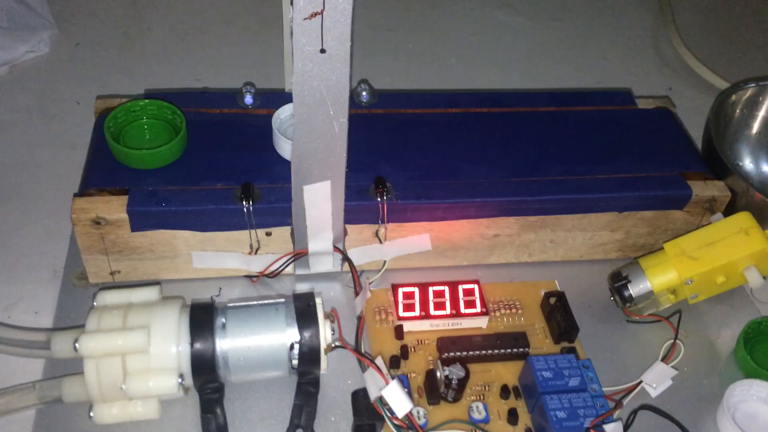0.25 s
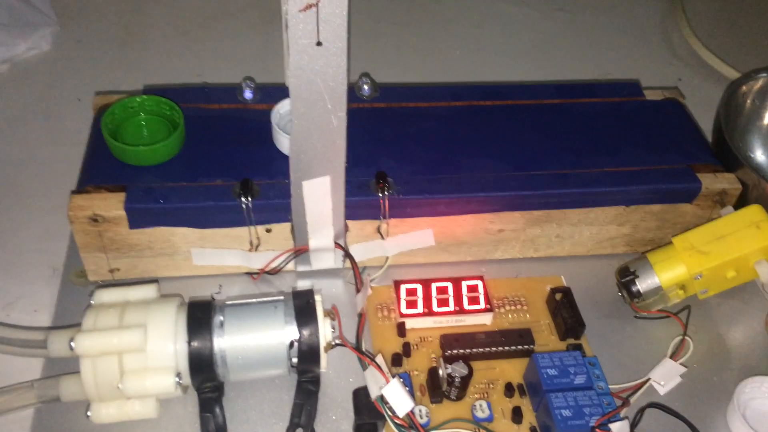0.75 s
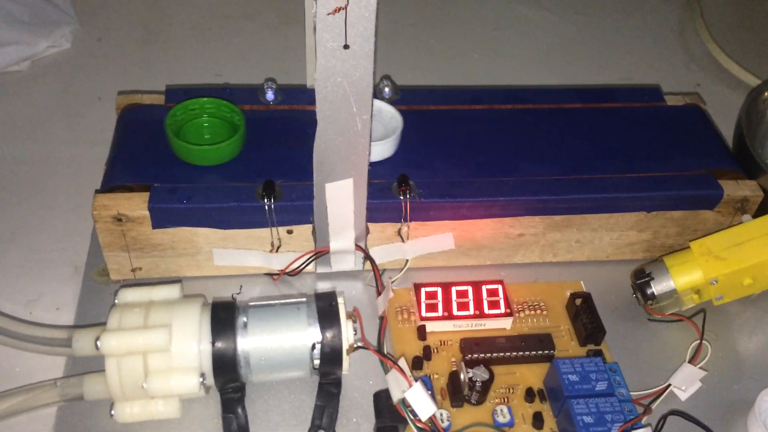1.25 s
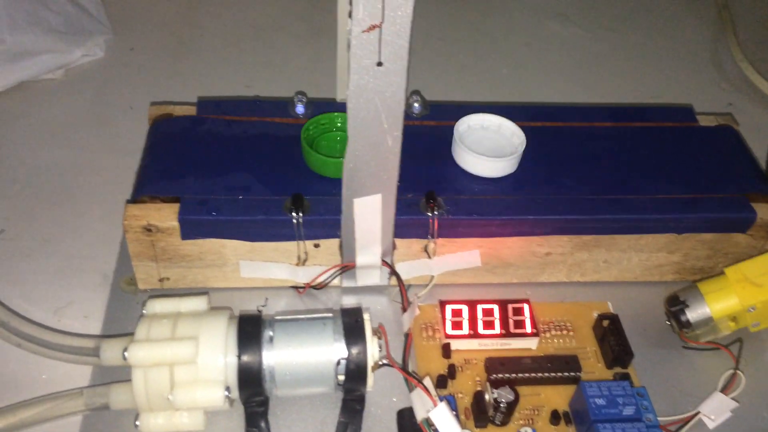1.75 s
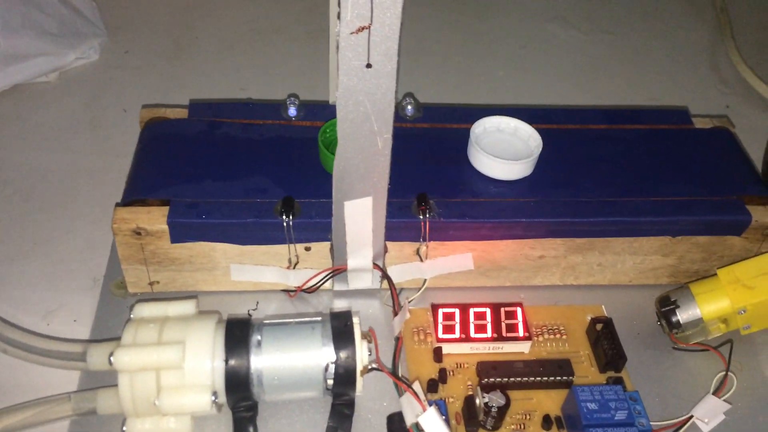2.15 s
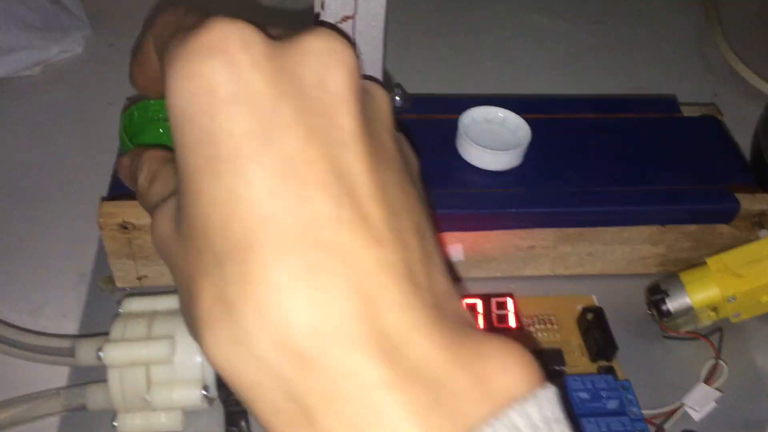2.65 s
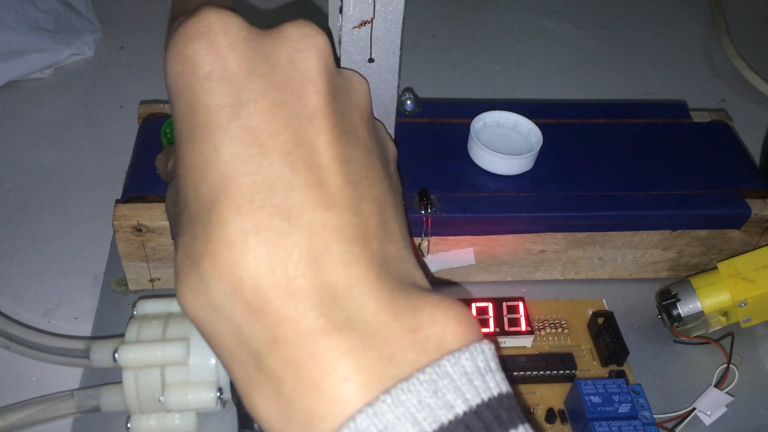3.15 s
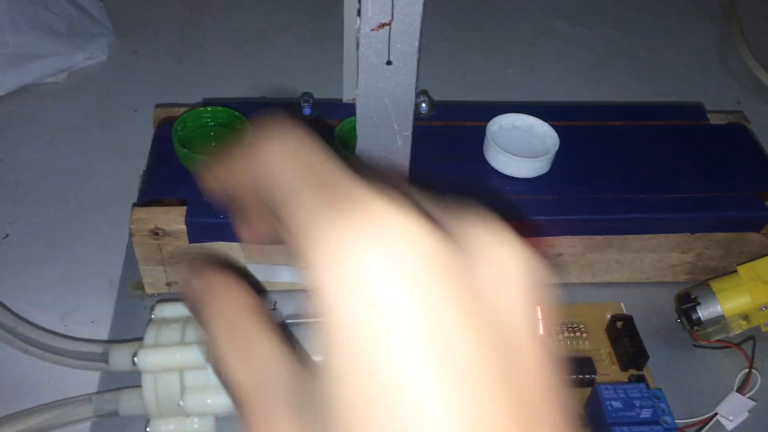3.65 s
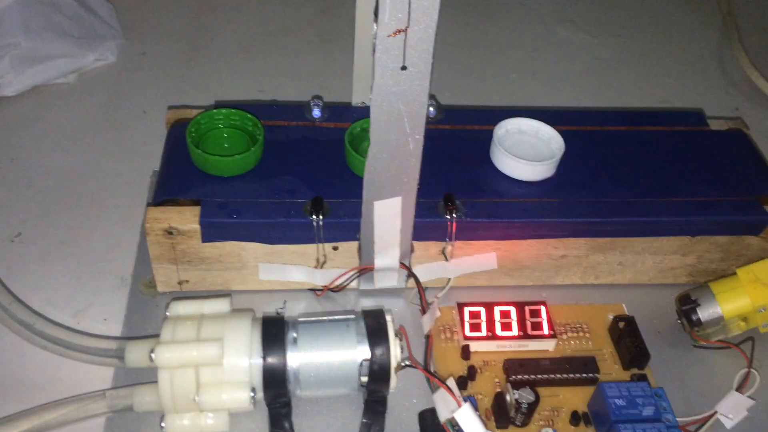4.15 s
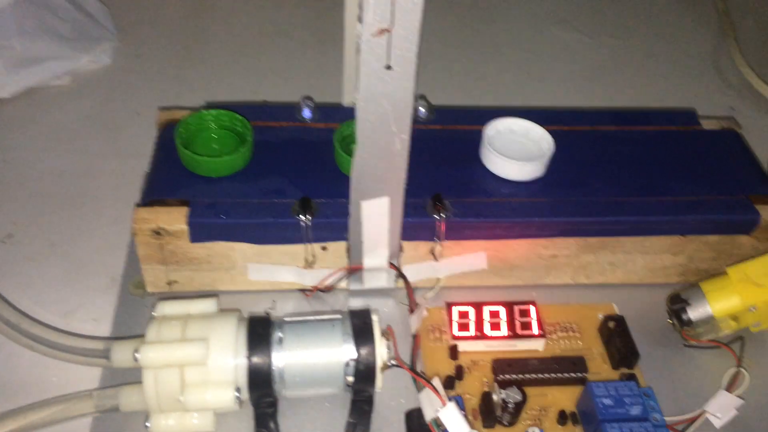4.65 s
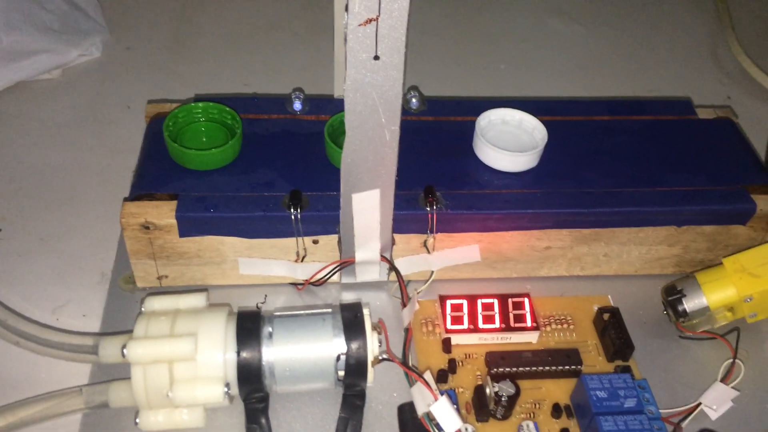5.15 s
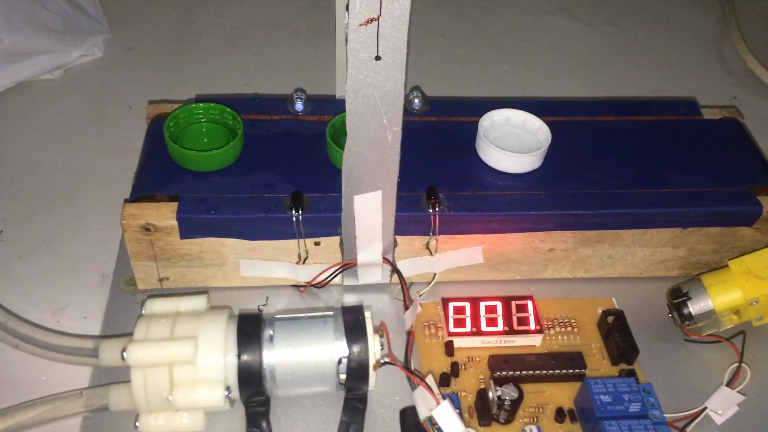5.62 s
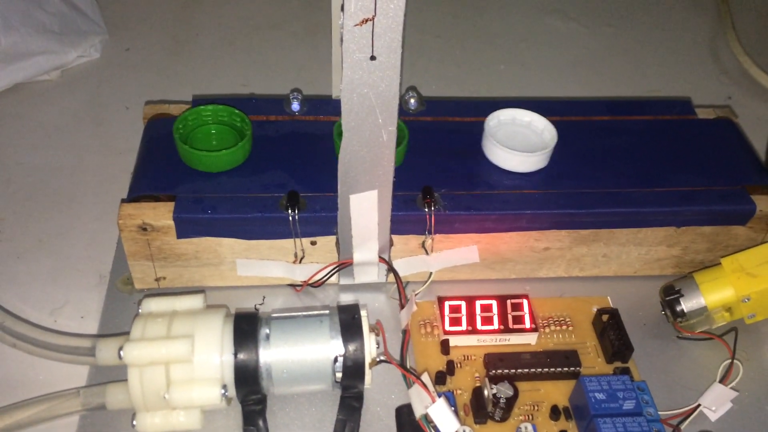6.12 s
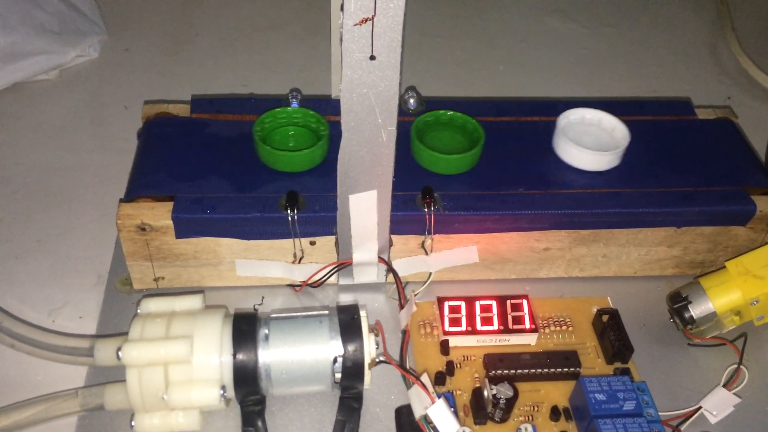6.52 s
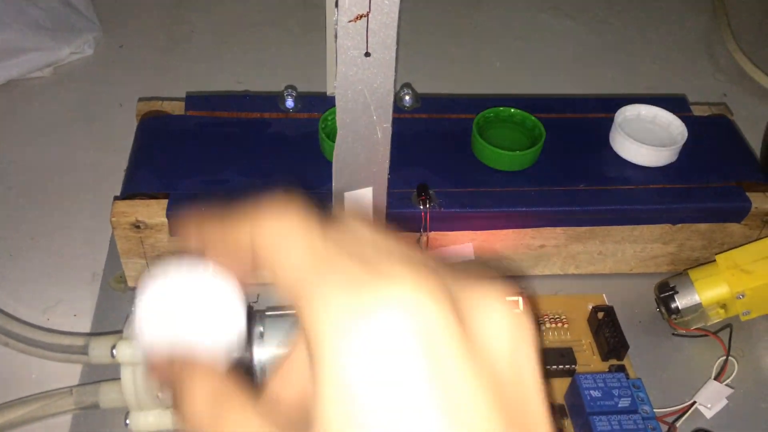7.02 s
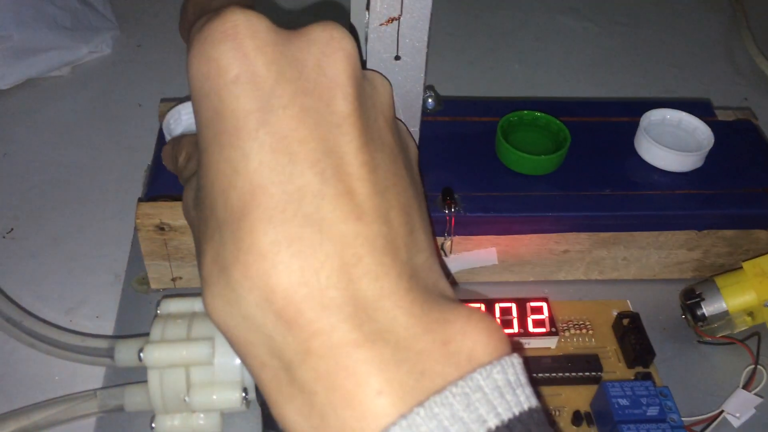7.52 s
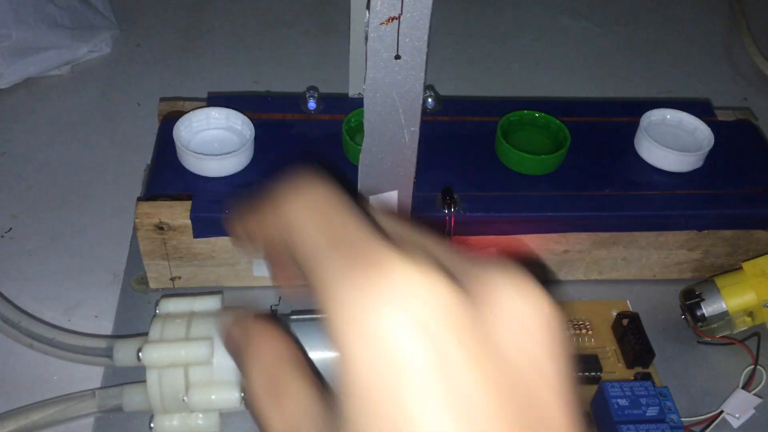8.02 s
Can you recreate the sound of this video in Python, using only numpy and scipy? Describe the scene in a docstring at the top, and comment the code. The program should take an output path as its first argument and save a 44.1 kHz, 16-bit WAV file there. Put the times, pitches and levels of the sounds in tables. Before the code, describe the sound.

Close up on a table in a small quiet room, a plastic cap scrapes briefly. A sharp relay click starts a small gear motor, which whirrs with a harsh nasal rattle for under a second, clicks off and coasts down. A second relay clicks on and off. Fingers tick lightly on plastic caps over a low hum. Later the same motor burst and relay clicks repeat, ending with more soft ticks.

```python
"""Small bottle-cap filling line

A model filling line on a table, heard close up. Twice a relay starts a small plastic gear motor that drives
the belt, is switched off and coasts to rest; a second relay then clicks on and off.
A cap is scraped off the table and others tick under the fingers, over the low hum of a small room.
Gear blows and noise ring plastic shapes, short cracks make the clicks and ticks, sines make hum and tones."""
import sys
import numpy as np
from scipy import signal
from scipy.fft import rfft, irfft, next_fast_len
from scipy.io import wavfile
from scipy.ndimage import uniform_filter1d, map_coordinates

SR = 44100
rng = np.random.default_rng(int(sys.argv[2]) if len(sys.argv) > 2 else 0)


def unload_wav(signal):
    """Save mono or channel-first audio to the path in sys.argv[1] as 16-bit WAV at rate SR, clipped to [-1, 1]."""
    wavfile.write(
        sys.argv[1],
        SR,
        np.round(np.clip(np.atleast_2d(signal).T, -1, 1) * 32767).astype(np.int16),
    )


N = 365059  # length in samples

# Belt runs. Each row: power on and power off in seconds, coasting time in seconds, tooth rate at full speed
# in hertz before any drag, then base levels in dB of the clean tooth tone, gear clatter and brush hiss.
BELT_RUNS = [(1.176, 1.859, .32, 546.7, -32, -32, -37.5), (6.158, 6.826, .325, 539.6, -33, -31, -37)]
# Once in each run the belt drags, which slows the motor and loads the gears. Each row: start and end in
# seconds, sag of the tooth rate in hertz, added clatter in dB.
BELT_DRAGS = [(1.67, 1.9, 17, 4), (6.498, 6.71, 15, 3)]
# Tone colours of the drive: housing, loaded gears, slack gears while coasting, and brushes.
# Each row: frequency in hertz, relative level in dB per hertz.
HOUSING_COLOUR = [(280, -37), (350, -23), (430, -32.5), (500, -14.5), (570, -7), (615, 0), (715, 1),
                  (770, -4.5), (880, -18), (950, -21), (1200, -48)]
GEAR_COLOUR = [(700, -35), (880, -11.5), (1050, 2), (1230, -1.5), (1330, -12), (1480, -9.5), (1620, 0.5),
               (1850, -6.5), (2020, -1), (2450, -2.5), (3000, -6), (3220, -16), (3700, -13), (4200, -22),
               (4600, -37.5), (6100, -66)]
SLACK_COLOUR = [(520, -41), (880, -7.5), (1010, -3.5), (1160, -0.5), (1350, -17.5), (1680, -6), (1850, -13),
                (2360, -4.5), (2760, -22.5), (3020, -15), (3240, -25.5), (3680, -24), (4700, -48),
                (6110, -70), (10300, -120)]
BRUSH_COLOUR = [(2590, -32.5), (4400, -10.5), (4770, -16.5), (5730, -5.5), (6780, -7), (7510, -1.5),
                (8500, -4.5), (12100, -0.5), (13300, -0.5), (14300, -7), (15200, -8), (16000, -12.5)]
# Narrow resonances of the gearbox shell. Each row: frequency in hertz, relative level in dB.
SHELL_MODES = [(608.3, -38), (1233, -44.5), (1583, -57), (2186, -52.5), (2789, -52.5), (3591, -58)]
# Clean lines of the motor. Each row: multiple of the shaft rate, level in dB relative to the tooth tone.
MOTOR_LINES = [(9, 2), (12, -4.5), (18, -18), (21, -16)]
# Relay armatures snapping shut. Each row: time of the main hit in seconds, base level in dB, level of the
# first touch in dB relative to that, and how many seconds earlier the touch comes.
RELAY_CLOSINGS = [(1.176, -14.5, -15.5, 0.00323), (2.218, -16, -22, 0.00075), (6.1596, -14.5, -19, .0035),
                  (7.1847, -16.5, -26.5, 0.00065)]
# Relay armatures springing back. Each row: time in seconds, base level in dB.
RELAY_OPENINGS = [(1.858, -21.5), (2.576, -26.5), (6.826, -21.5), (7.5425, -27.5)]
# Tone colours of the two relay clicks. Each row: frequency in hertz, relative level in dB per hertz.
CLOSING_COLOUR = [(240, -52), (400, -10), (700, -9.5), (2150, -12.5), (2880, -2.5), (3580, -13.5),
                  (4180, -9), (4950, -13), (6540, -5), (7400, -6), (8300, 2), (9400, -15), (10400, -6),
                  (12000, -16), (14600, -19), (16000, -37)]
OPENING_COLOUR = [(290, -39), (500, -11), (855, -0.5), (1640, -19.5), (2390, -8), (2650, -24.5),
                  (3440, -2.5), (3980, -16), (5020, -9), (6060, -6.5), (7980, -17), (9220, 0), (11300, -17),
                  (14700, -14), (16000, -35.5)]
# A cap sliding over the table, one long faint scrape with two short louder ones.
# Each row: start and end in seconds, base level in dB, brightness from 0 (dull) to 1 (full).
SCRAPE_STROKES = [(0.679, 0.849, -54.5, 0.67), (.723, 0.763, -42, 0.93), (0.826, 0.841, -39, 0.21)]
# Tone colour of the scrape. Each row: frequency in hertz, relative level in dB per hertz.
SCRAPE_COLOUR = [(300, -37), (430, -19.5), (550, -1.5), (720, -11), (1010, 2), (1250, -10), (1860, -3.5),
                 (2270, -13), (2900, -8), (3500, -9.5), (4600, -33), (7500, -27.5), (10000, -38),
                 (16000, -49)]
# Light plastic ticks. Each row: time in seconds, wall ring in hertz and its base level in dB,
# rim ring in hertz and its base level in dB, dry snap level in dB.
CAP_TICKS = [(2.4575, 3260, -42, 5392, -38, -59), (2.4955, 3200, -60.5, 11460, -41.5, -69.5),
             (3.0278, 2280, -40, 3260, -45, -57.5), (3.321, 3050, -29.5, 6240, -44, -46.5),
             (3.4185, 2323, -40, 6200, -62, -57), (3.474, 2116, -45.5, 7000, -61.5, -61.5),
             (3.5745, 4680, -33.5, 6150, -30.5, -49), (3.6794, 2900, -46.5, 6500, -50.5, -63),
             (3.7015, 2850, -40.5, 6600, -38.5, -56), (3.7565, 3180, -53.5, 9795, -49.5, -60),
             (3.937, 3800, -55, 8480, -29.5, -60), (4.9236, 2196, -33.5, 4150, -46, -42.5),
             (7.582, 6500, -47, 10430, -38, -61), (7.716, 3760, -38.5, 6000, -49, -48.5),
             (7.937, 2944, -41.5, 5300, -35, -49.5), (8.084, 2090, -38.5, 6700, -50, -55),
             (8.09, 2070, -38, 6900, -35, -50), (8.1237, 2100, -44.5, 4000, -58, -60.5)]
# Faint rustles of the hand. Each row: middle in seconds, level in dB, half the duration in seconds.
HAND_RUSTLES = [(0.337, -60.5, 0.0077), (2.636, -72, 0.076), (2.73, -72.5, 0.043), (5.256, -64.5, 0.033)]
# Fingers at work on the caps. Each row: start and end in seconds, loudest tick in dB, rubbing in dB.
FINGER_WORK = [(2.37, 2.74, -57, -62.5), (2.8, 3.824, -64.5, -69.5), (7.36, 7.7, -58, -62),
               (7.899, 8.194, -61, -65.5)]
# Tone colour of skin on plastic. Each row: frequency in hertz, relative level in dB per hertz.
RUB_COLOUR = [(250, -20), (500, 2), (800, 2.5), (1200, -10), (2000, -9.5), (3500, -23), (7000, -23.5),
              (16000, -32)]
# Tone colour of the room air. Each row: frequency in hertz, relative level in dB per hertz.
AIR_COLOUR = [(25, -36), (40, -8.5), (62, -2.5), (120, -2), (200, -10.5), (290, -12.5), (450, -19),
              (600, -21.5), (850, -19.5), (1300, -28), (2200, -36.5), (4500, -46.5), (10000, -47),
              (16000, -54)]
# Slow swells of the low background. Each row: peak in seconds, half-width in seconds,
# rise of the hum in dB, rise of the rumble in dB.
LOW_SWELLS = [(.4, 0.485, 14, 7), (1.6, .15, 5, 4.5), (4.25, 0.52, 14, 3.5), (6.7, 0.16, 8.5, 1.5),
              (8.05, 1, 2.5, 6)]
# Faint tones that come and go in the room. Each row: start and end in seconds, pitch in hertz, level in dB.
FAINT_TONES = [(-.2, .75, 274.5, -64.5), (-.2, .7, 503, -66.5), (2.6, 3.45, 357, -63.5),
               (2.6, 6.103, 444.6, -72.5), (4.398, 5.901, 2859, -87)]
# How the room dies away. Each row: frequency in hertz, seconds to fall by 60 dB.
ROOM_DECAY = [(200, 0.315), (2500, 0.449), (8000, 0.3), (15000, .38)]
# More tone colours: dry snaps and rustles, finger ticks, rumble, and relay clicks spread by the room.
# Each row: frequency in hertz, relative level in dB per hertz.
SNAP_COLOUR = [(600, -1.5), (1500, -0.5), (2600, -0.5), (7000, -8), (11000, -10.5), (16000, -7.5)]
FINGER_TICK_COLOUR = [(1500, -6.5), (3500, 2.5), (6000, -5), (11000, -3.5), (16000, -3.0)]
RUMBLE_COLOUR = [(40, -41), (70, -7.5), (125, 0.5), (200, 0.0), (260, -19), (700, -54.5)]
DIFFUSE_COLOUR = [(400, -23.5), (1500, 7), (3000, -3), (8000, -3.5), (12000, -9), (16000, -13)]
# Tone colour of ringing plastic. Each row: multiple of its pitch, relative level in dB per hertz.
PLASTIC_COLOUR = [(.5, -42), (0.845, -17), (1, 0), (1.206, -14), (2.02, -34), (3, -55)]

DRAG_RAMP_S = .07  # how fast a drag sets in and lets go
SPIN_UP_S, SLACKEN_S = .032, 0.1234  # time constant of the motor; time for unpowered gears to go slack
DRONE_DB, DRAG_DRONE_DB = -31.5, 1  # the housing at full speed, and its rise under a drag
SURGE_DB, SURGE_S = 4.5, .22  # extra clatter while the belt gets going, and how long it lasts
SLACK_DRONE_DB, SLACK_SHELL_DB = -9, -3.5  # slack gears drum less on the housing and ring the shell less
# while coasting each level follows this power of the speed
DRONE_POWER, CLATTER_POWER, HISS_POWER = .45, 0.163, 2.13
STALL_SPEED, STALL_POWER = 0.286, 2.6  # below this share of full speed the gears fall quiet, by this power
STROKE_ATTACK_S, STROKE_T60_S = .011, .04  # the rim catches; then seconds to fall 60 dB after a stroke
HUM_HZ, HUM_DB, RUMBLE_DB = 61.93, -61.5, -59  # average hum pitch; low levels between swells
AIR_DB = -53
TONE_FADE_S = 0.123
TOP_HZ = 15800  # nothing is kept from here up


def gear_motor(run, drag):
    """The motor spins up, meshes its gears under load and coasts down once the power is cut."""
    on, off, coast, tooth_hz, whine_db, clatter_db, hiss_db = run
    drag_start, drag_end, sag_hz, drag_db = drag
    t = np.arange(N) / SR
    age = np.maximum(t - on, 0)
    spin_up = 1 - np.exp(-age / SPIN_UP_S)
    run_down = np.clip(1 - (t - off) / coast, 0, 1)
    speed = spin_up * run_down
    load = np.clip(.5 + np.minimum(t - drag_start, drag_end - t) / DRAG_RAMP_S, 0, 1)
    tooth_rate = speed * (tooth_hz - sag_hz * load) * (1 + .003 * wobble(40))
    teeth = np.cumsum(tooth_rate) / SR  # running count of teeth gone by
    shaft = teeth / 9  # turns of a nine-tooth pinion

    # the blows drum on the housing and ring the shell, and the gears chatter after each one
    drum = tooth_blows(teeth, scatter=0.000487, pitch_error=.0006, uneven_db=1.5)
    drone = steady(colour(drum, HOUSING_COLOUR))
    mesh = tooth_blows(teeth, scatter=.00006, pitch_error=.0004, uneven_db=2.5)
    chatter = rng.standard_normal(N) * (1 + .5 * np.cos(2 * np.pi * teeth))
    loaded = 0.633 * steady(colour(mesh, GEAR_COLOUR)) + 0.656 * colour(chatter, GEAR_COLOUR)
    blows = tooth_blows(teeth, scatter=.0004, pitch_error=.0002, uneven_db=2)
    shell = 0.643 * steady(resonate(blows, SHELL_MODES, width_hz=24.3))

    # without power the gears go slack and rattle between their flanks
    slackness = np.clip((t - off) / SLACKEN_S, 0, 1)
    slack = 0.398 * steady(colour(blows, SLACK_COLOUR)) + 0.67 * colour(chatter, SLACK_COLOUR)
    clatter = np.sqrt(1 - slackness) * loaded + np.sqrt(slackness) * slack
    clatter += amp(SLACK_SHELL_DB * slackness) * shell

    # the brushes rub harder once a turn and bump over the three commutator segments
    rubbing = np.cos(2 * np.pi * shaft) + np.cos(6 * np.pi * shaft) + np.cos(12 * np.pi * shaft)
    rub_db = (1 + 1.282 * slackness) * rubbing + 1.57 * wobble(300)
    hiss = colour(rng.standard_normal(N) * amp(rub_db), BRUSH_COLOUR)

    # the lines are strong only near full speed, where they meet the housing's resonances
    whine = np.zeros(N)
    for order, db in MOTOR_LINES:
        line = np.sin(2 * np.pi * round(order) * shaft)
        whine += line * amp(whine_db + db + 1.9 * wobble(12)) * speed ** 7

    # levels follow speed and load
    drone_db = DRONE_DB + DRAG_DRONE_DB * load + SLACK_DRONE_DB * slackness ** 2 + 0.9 * wobble(20)
    surge_db = SURGE_DB * np.exp(-(age / SURGE_S) ** 2)
    rattle_db = clatter_db + surge_db + drag_db * load + 0.48 * wobble(20)
    body = amp(drone_db) * run_down ** DRONE_POWER * drone
    body += amp(rattle_db) * run_down ** CLATTER_POWER * clatter
    body += amp(hiss_db) * run_down ** HISS_POWER * hiss
    turning = spin_up ** .7 * np.clip(run_down / STALL_SPEED, 0, 1) ** STALL_POWER
    return whine + turning * body


def tooth_blows(teeth, scatter, pitch_error, uneven_db, count=9):
    """One blow per pinion tooth, each with its own strength and spacing error (s); backlash scatters them (s)."""
    at = np.flatnonzero(np.diff(np.floor(teeth)) > 0)
    late, size = rng.standard_normal((len(at), 2)).T
    # these errors repeat every turn of the pinion
    wear, offset = rng.standard_normal((count, 2))[np.arange(len(at)) % count].T
    shift = SR * (scatter * late + pitch_error * unit(offset))
    at = np.clip(np.round(at + shift).astype(int), 0, N - 1)
    return np.bincount(at, amp(uneven_db * (size + wear)), N)


def relays():
    """Armatures touch lightly, snap shut with a sharp click and rebound faintly.

    Springing back they bounce and ring the circuit board."""
    shut, spring, board = np.zeros((3, N))
    t = np.arange(SR // 10) / SR
    for s, db, touch_db, lead in RELAY_CLOSINGS:
        add(shut, s - lead, amp(db + touch_db) * burst(t60=0.027))  # first touch
        add(shut, s, amp(db - 3.0) * burst(t60=0.00756))  # main hit
        add(shut, s + 0.0011022, amp(db - 11.5) * burst(t60=0.021))  # faint rebound
    board_ring = np.sin(2 * np.pi * 720 * t) * amp(-60 * t / 0.0418)
    for s, db in RELAY_OPENINGS:
        add(spring, s, amp(db - 1.5) * burst(t60=0.01844))
        add(spring, s + 0.0022, amp(db - 6.5) * burst(t60=.035))  # the bounce
        add(board, s + 0.00599, amp(db - 5.5) * board_ring)
    return colour(shut, CLOSING_COLOUR) + colour(spring, OPENING_COLOUR) + board


def scrape():
    """The rim of a cap sticks and slips across the table, as uneven noise mixed from bright and dull."""
    t = np.arange(N) / SR
    slips = unit(colour(rng.standard_normal(N) * amp(2 * wobble(500)), SCRAPE_COLOUR))
    dull = unit(signal.lfilter(*signal.butter(2, 1700, fs=SR), slips))
    sound = np.zeros(N)
    for start, end, db, brightness in SCRAPE_STROKES:
        attack = np.clip((t - start) / STROKE_ATTACK_S, 0, 1)
        stroke = attack * amp(db - 60 * np.maximum(t - end, 0) / STROKE_T60_S)
        sound += stroke * (brightness * slips + (1 - brightness) * dull)
    return sound


def caps():
    """A tiny snap rings a thin plastic wall and rim at pitches set by the spot touched; fingers rustle."""
    rings, snaps = np.zeros((2, N))
    for s, wall_hz, wall_db, rim_hz, rim_db, snap_db in CAP_TICKS:
        add(rings, s, amp(wall_db - 8.5) * ring(wall_hz) + amp(rim_db - 9.0) * ring(rim_hz))
        add(snaps, s, amp(snap_db) * burst(t60=0.013))
    for s, db, half_length in HAND_RUSTLES:
        swell = np.hanning(round(2 * half_length * SR))
        add(snaps, s - half_length, amp(db) * swell * rng.standard_normal(len(swell)))
    return rings + colour(snaps, SNAP_COLOUR)


def ring(hz):
    """A damped plastic resonance: a short crack coloured by a peak at the given pitch."""
    return colour(burst(t60=0.01947), [(ratio * hz, db) for ratio, db in PLASTIC_COLOUR])


def fiddling(count=20):
    """Fingers rub softly over thin plastic and make a scatter of tiny bright ticks."""
    ticks, rub = np.zeros((2, N))
    for start, end, db, rub_db in FINGER_WORK:
        swell = signal.windows.tukey(round((end - start) * SR))
        add(rub, start, amp(rub_db) * swell * rng.standard_normal(len(swell)))
        for when, softness in rng.random((count, 2)):
            add(ticks, start + when * (end - start), amp(db - 8.6 * softness) * burst(t60=0.02))
    return colour(rub * amp(1.6 * wobble(30)), RUB_COLOUR) + colour(ticks, FINGER_TICK_COLOUR)


def background():
    """Room air as noise, with a slowly swelling rumble, a wavering low hum and a few faint tones."""
    t = np.arange(N) / SR
    air = amp(AIR_DB) * unit(colour(rng.standard_normal(N), AIR_COLOUR))
    hum_rise_db, rumble_rise_db = np.zeros((2, N))
    for peak, width, hum_db, rumble_db in LOW_SWELLS:
        swell = np.exp(-((t - peak) / width) ** 2)
        hum_rise_db += hum_db * swell
        rumble_rise_db += rumble_db * swell
    rumble = unit(colour(rng.standard_normal(N), RUMBLE_COLOUR))
    rumble *= amp(RUMBLE_DB + rumble_rise_db + 1.08 * wobble(8.5))
    hum = np.sin(2 * np.pi * np.cumsum(HUM_HZ + 1.3 * wobble(6.2)) / SR)
    hum *= amp(HUM_DB + hum_rise_db + 2.6 * wobble(5.8))
    tones = np.zeros(N)
    for start, end, hz, db in FAINT_TONES:
        tone = np.sin(2 * np.pi * np.cumsum(hz * (1 + 0.00579 * wobble(8))) / SR)
        fade = np.clip(np.minimum(t - start, end - t) / TONE_FADE_S, 0, 1)
        tones += tone * amp(db + 2.08 * wobble(5.04)) * fade
    return air + rumble + hum + tones


def room(x):
    """The small room's answer, 5 ms later: a noise tail where each frequency dies at its own speed."""
    hz, t, z = signal.stft(rng.standard_normal(SR // 2), SR, nperseg=256)
    fade = amp(-60 * t / along(ROOM_DECAY, hz)[:, None])
    tail = signal.istft(z * fade, SR, nperseg=256)[1]
    delayed = np.pad(x, (round(.005 * SR), 0))
    return signal.fftconvolve(delayed, tail / np.linalg.norm(tail))[:N]


def scene():
    """Everything on the table, in the room."""
    drive = sum(gear_motor(run, drag) for run, drag in zip(BELT_RUNS, BELT_DRAGS))
    clicks, handling, slide = relays(), caps() + fiddling(), scrape()
    # part of each relay click reaches the walls as a diffuse, unpitched burst
    diffuse = colour(clicks * rng.standard_normal(N), DIFFUSE_COLOUR)
    echo = room(amp(-16) * drive + amp(-17.5) * clicks + amp(-19) * slide)
    echo += room(amp(-14.5) * handling + amp(-20) * diffuse)
    return (drive + clicks + handling + slide + echo + background())[None]


def record(dry):
    """Cut off everything from TOP_HZ upward."""
    size = next_fast_len(N + SR // 2)
    keep = np.fft.rfftfreq(size, 1 / SR) < TOP_HZ
    return irfft(rfft(dry, size) * keep, size)[:, :N]


def amp(db):
    """Decibels to gain."""
    return 10 ** (np.asarray(db) / 20)


def unit(x):
    """x scaled to an average (rms) level of 1."""
    return x / np.sqrt(np.mean(x ** 2) + 1e-20)


def along(points, hz):
    """Read values between (Hz, value) points on a log frequency axis."""
    f, v = np.transpose(points)
    return np.interp(np.log(hz + 1), np.log(f + 1), v)


def wobble(rate):
    """A smooth random curve through about `rate` random points a second."""
    points = rng.standard_normal(int(N * rate / SR) + 4)
    return map_coordinates(points, [np.arange(N) * rate / SR])


def colour(x, spectrum, size=4096):
    """x through a body of unit energy with the given spectrum, which answers only after each blow."""
    gain = np.maximum(amp(along(spectrum, np.fft.rfftfreq(size, 1 / SR))), 1e-6)
    # folding the cepstrum (the spectrum of the log spectrum) makes the body respond as early as it can
    cepstrum = irfft(np.log(gain))
    cepstrum[1:size // 2] *= 2
    cepstrum[size // 2 + 1:] = 0
    body = irfft(np.exp(rfft(cepstrum)))
    return signal.fftconvolve(x, body / np.linalg.norm(body))[:len(x)]


def resonate(x, modes, width_hz):
    """x through a bank of narrow (Hz, dB) resonances with alternating signs."""
    size = next_fast_len(N + SR // 2)
    f = np.fft.rfftfreq(size, 1 / SR)
    bank = 0
    for k, (hz, db) in enumerate(modes):
        damping = 1j * f * width_hz
        bank = bank + (-1) ** k * amp(db) * damping / (hz * hz - f * f + damping)
    return irfft(rfft(x, size) * bank, size)[:N]


def add(track, s, sound):
    """Mix a short sound into the track at time s in seconds."""
    part = track[round(s * SR):][:len(sound)]
    part += sound[:len(part)]


def burst(t60, size=4096):
    """An evenly bright noisy crack, with the energy of a fade from 1 that falls 60 dB in t60 seconds."""
    fade = amp(-60 * np.arange(size) / SR / t60)
    crack = rng.standard_normal(size) * fade
    # flatten the spectrum while keeping a decay, so that the crack has no pitch of its own
    for _ in range(3):
        crack = irfft(np.exp(1j * np.angle(rfft(crack)))) * np.sqrt(fade)
    crack = irfft(np.exp(1j * np.angle(rfft(crack)))) * np.minimum(30 * fade, 1)
    return crack * np.linalg.norm(fade) / np.linalg.norm(crack)


def steady(x, size=2048):
    """x with its slow level held near 1; very quiet parts stay quiet."""
    power = np.abs(uniform_filter1d(x ** 2, size))
    return x / np.sqrt(power + power.max() / 1000)


dry = scene()
out = record(dry)
unload_wav(out)
```